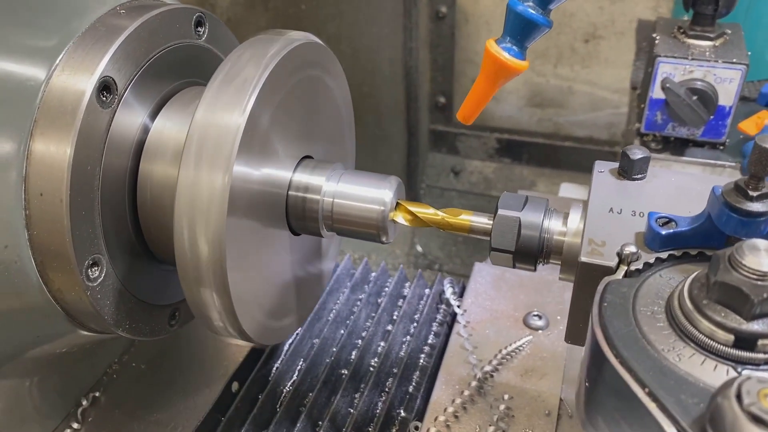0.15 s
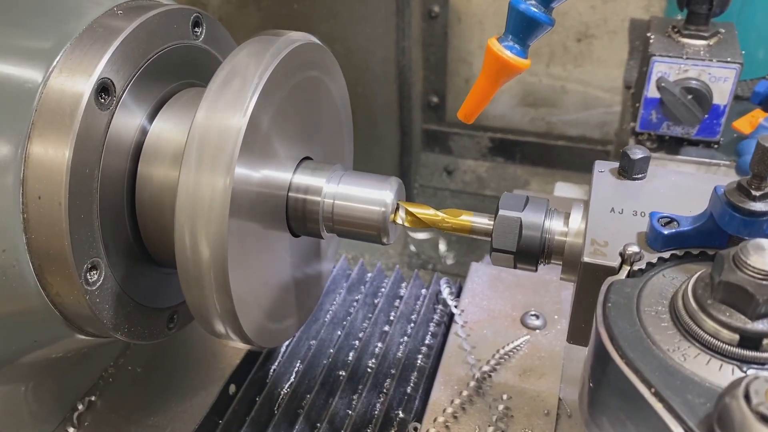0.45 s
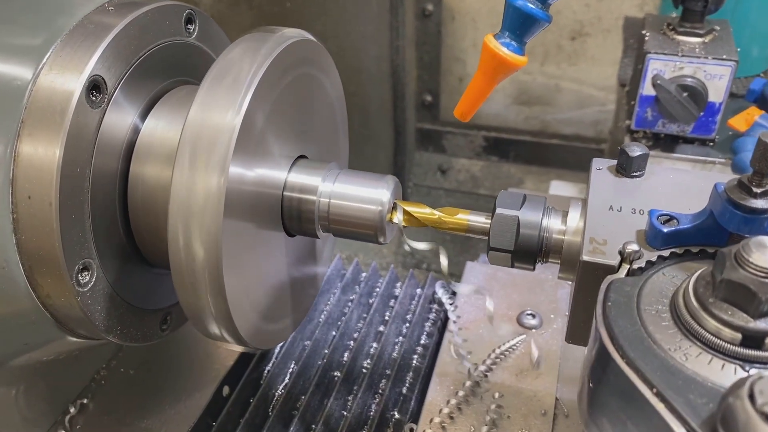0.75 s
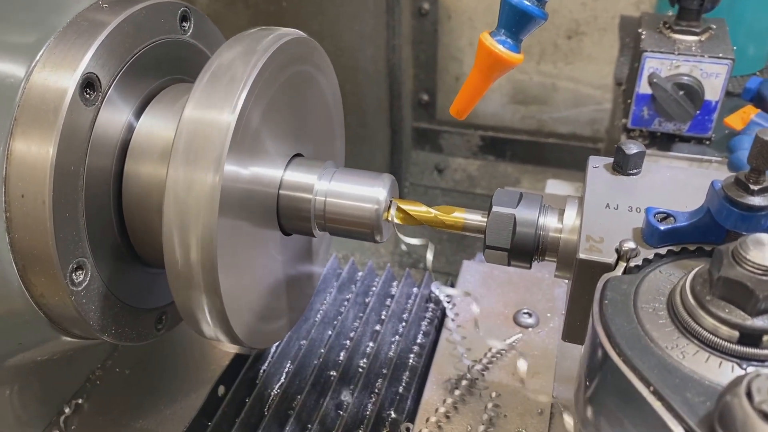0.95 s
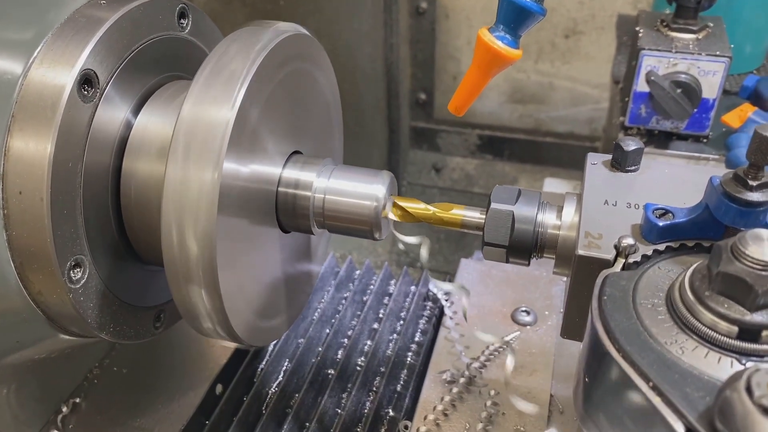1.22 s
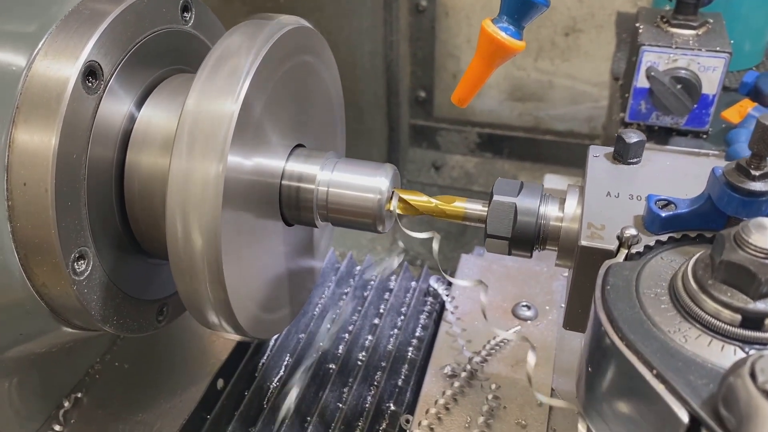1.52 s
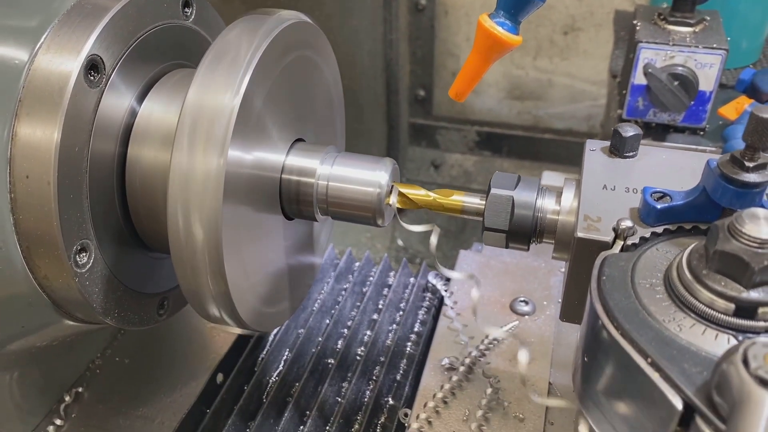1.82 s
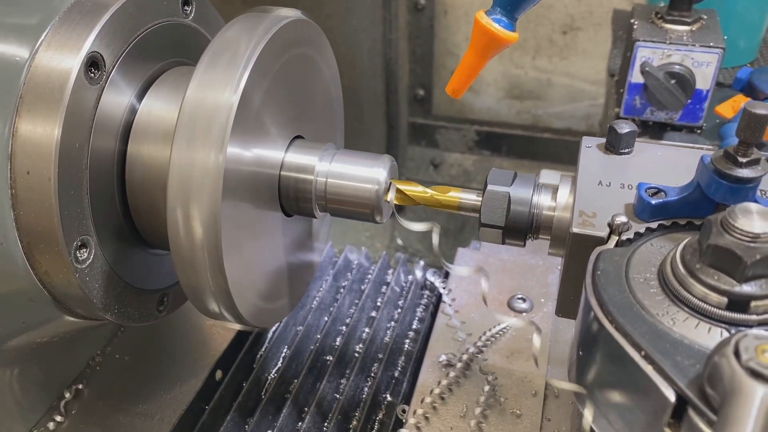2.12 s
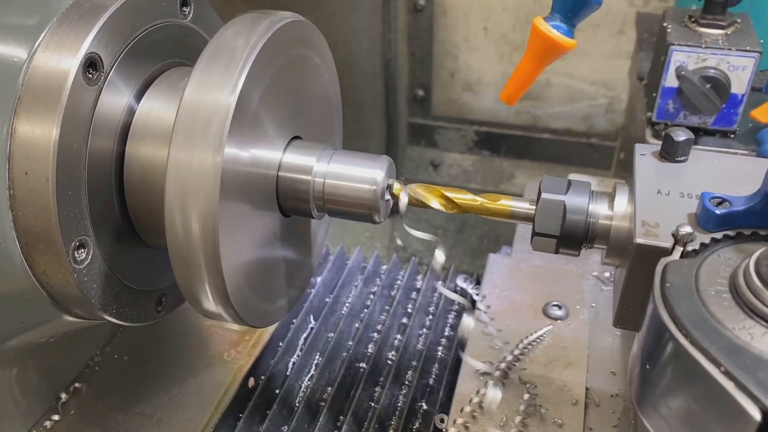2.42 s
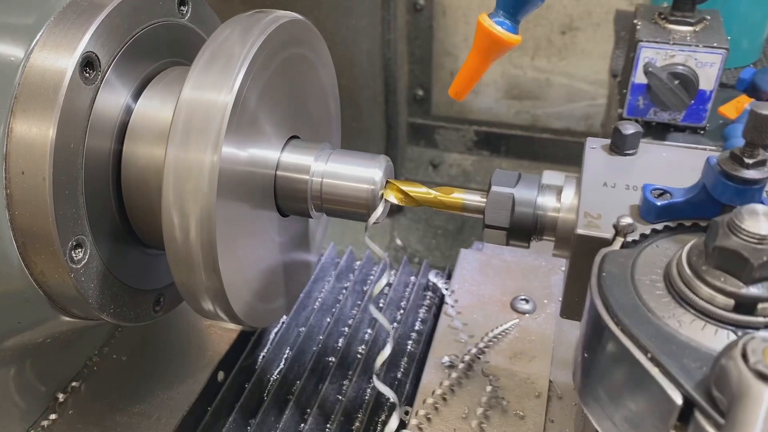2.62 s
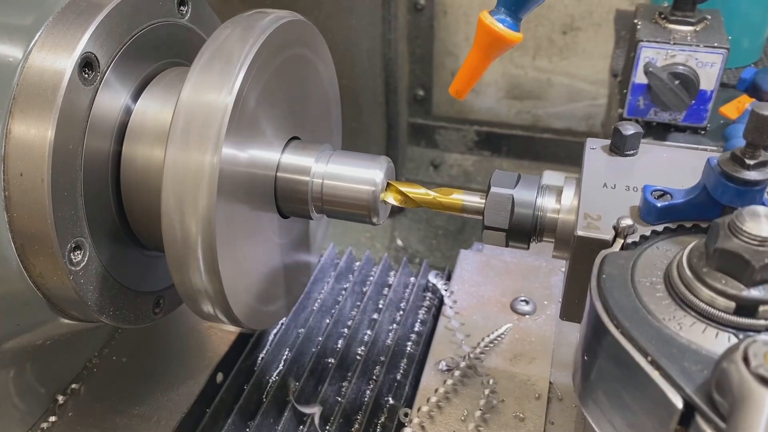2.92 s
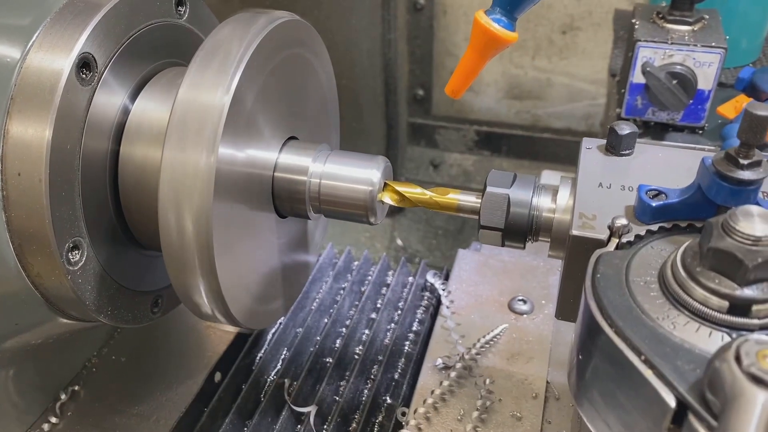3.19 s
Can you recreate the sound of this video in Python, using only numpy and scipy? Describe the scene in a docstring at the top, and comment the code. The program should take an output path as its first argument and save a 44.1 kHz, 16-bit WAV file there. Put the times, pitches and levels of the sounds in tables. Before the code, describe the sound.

A cutting-oil mist nozzle hisses brightly and continuously over a lathe, patchy and slightly fluttering. Brief high drill squeaks sound at about 0.06 and 0.2 s, with dull, deep bumps on the phone near 0.1 and 0.25 s. Hiss flares at 0.7, 2.2 and 2.55 s, the last sliding downward. From 2.87 s, thin squeaks repeat rapidly with faint rubbing; a weak bump lands near 3.27 s. Motor rumble stays low behind.

```python
"""A lathe drill squeaks as its flutes rub in a metal bar: short sagging tones of four partials plus faint rubbing noise.
A steady oil-mist nozzle covers it with coloured, patchy noise, and now and then the hiss flares in sliding bands.
A close phone picks it up and gets a few dull bumps: ringing case modes, falling thuds and a slow shake.
Behind it all the motor hums low, as filtered rumble with three narrow noise bands."""
import sys
import numpy as np
from scipy import signal
from scipy.fft import rfft, irfft, next_fast_len
from scipy.io import wavfile
from scipy.ndimage import uniform_filter1d, map_coordinates

SR = 44100
rng = np.random.default_rng(int(sys.argv[2]) if len(sys.argv) > 2 else 0)


def wav_out(sig):
    """Save sig, one row per channel (or a flat mono array), as 16-bit PCM at SR to the path in sys.argv[1]."""
    wavfile.write(sys.argv[1], SR, np.round(np.clip(np.atleast_2d(sig).T, -1, 1) * 32767).astype(np.int16))


N = 147735


def amp(db):
    """Decibels to linear gain."""
    return 10 ** (np.asarray(db) / 20)


def unit(x):
    """Scale to an rms of 1."""
    return x / np.sqrt(np.mean(x ** 2) + 1e-20)


def along(points, hz):
    """Read (pitch_hz, value) points on a log frequency axis."""
    point_hz, value = np.transpose(points)
    return np.interp(np.log(hz + 1), np.log(point_hz + 1), value)


def curve(rows):
    """Draw the second column over time in seconds, one value per sample."""
    return np.interp(np.arange(N) / SR, *np.transpose(rows)[:2])


def wobble(rate):
    """A smooth random curve with `rate` knots a second."""
    knots = rng.standard_normal(int(N * rate / SR) + 4)
    return map_coordinates(knots, [np.arange(N) * rate / SR])


def filtered(x, response):
    """Filter x by a complex response of frequency, with room for a tail."""
    m = next_fast_len(N + SR // 4)
    spectrum = rfft(x, m) * response(np.fft.rfftfreq(m, 1 / SR))
    return irfft(spectrum, m)[..., :N]


def bell(position, centre, width):
    """Round Gaussian gain over frequency or time; width is one standard deviation."""
    return np.exp(-.5 * ((position - centre) / width) ** 2)


def patches(hz, t):
    """A random field of rms 1, smooth over a few bands and frames."""
    field = rng.standard_normal((len(hz), len(t)))
    field = uniform_filter1d(field, size=6, axis=0)
    return unit(uniform_filter1d(field, size=10, axis=1))


def shaped(gain):
    """Two unrelated noises shaped by a gain over frequency and time."""
    hz, t, z = signal.stft(rng.standard_normal((2, N)), SR, nperseg=512)
    return signal.istft(z * gain(hz[:, None], t), nperseg=512)[1][:, :N]


def ports(hz):
    """Gain and phase from a near source to the two microphone ports, split evenly between them."""
    # Phase by which the left port leads: pitch_hz, lead_rad
    port_lead = [(0, 0), (1120, .8), (1640, -.1), (3880, 2.1), (4650, -.4), (5000, .4), (6900, -.01),
                 (8010, -2.9), (9910, -5.8), (10500, -6.28), (11900, -6.32), (12800, -9.42), (13800, -9.43),
                 (15100, -12.5)]
    # Level difference of the ports: pitch_hz, left_minus_right_db
    port_tilt = [(200, .2), (600, 4), (2000, 4), (3000, 1.5), (6300, .3), (7500, 3.5), (8500, 0)]
    lead = np.interp(hz, *np.transpose(port_lead))
    half = amp(along(port_tilt, hz) / 2) * np.exp(.5j * lead)
    return np.array([half, 1 / half])


def spread(pair):
    """Mix two unrelated noises to a left-right likeness, with the level and phase of ports()."""
    # How alike the noise is left and right, by pitch: pitch_hz, likeness_share
    likeness = [(100, 0.98), (700, 0.88), (1500, 0.545), (4500, 0.37), (5800, 0.65), (6200, 0.92),
                (6800, 1), (7500, 0.895), (9000, 0.61), (10800, 0.88), (12300, 0.51), (12900, 1),
                (14600, 1)]

    def turn(hz):
        return np.arccos(np.clip(along(likeness, hz), 0, 1)) / 2

    mid = filtered(pair[0], lambda hz: np.cos(turn(hz)) * ports(hz))
    side = filtered(pair[1], lambda hz: np.sin(turn(hz)) * ports(hz))
    return mid + side * [[1], [-1]]


def squeaks():
    """Rough stick-slip tones: pitch sags as the flute grips, then lifts; upper partials swell more steeply."""
    # Drill squeaks: start_s, length_s, pitch_hz, sag_share (start to lowest pitch), then
    # partial_1_db, partial_2_db, partial_3_db, partial_4_db (rms at full grip, before scatter and pan)
    squeak_table = [(0.056, 0.044, 3395, 0.014, -52, -23, -44, -17),
                    (0.201, 0.03, 3460, .005, -55, -35, -31.5, -40),
                    (0.205, 0.081, 3380, 0.015, -51, -24.5, -39, -20),
                    (2.873, 0.027, 3569, 0.0108, -32, -29, -36, -34.5),
                    (2.962, 0.027, 3493, 0.0148, -40, -31.5, -36, -34.5),
                    (3.01, 0.032, 3500, 0.019, -36.5, -30, -30.5, -31),
                    (3.077, 0.0256, 3505, .025, -37, -31, -31, -33.5),
                    (3.119, 0.0456, 3510, 0.036, -33.5, -29.5, -30.5, -31),
                    (3.198, 0.013, 3590, .02, -37, -33, -46, -36),
                    (3.248, 0.038, 3520, 0.038, -36.5, -31, -30, -23.5),
                    (3.301, 0.0299, 3500, 0.032, -36.5, -28.5, -32, -33.5)]
    # Faint rubbing between the late squeaks: time_s, level_db
    rub_level = [(2.82, -70), (2.95, -43), (3.35, -43)]
    # Pan beyond the ports' own: pitch_hz, left_minus_right_db
    pan = [(3500, 6), (6800, 1.5), (9000, 0)]
    rub_hz, rub_width_hz = 3540, 82
    lowest_at, edge = 0.495, 0.21  # share of the squeak: place of the lowest pitch, length of each soft end
    waver_share, shimmer_db = 0.0094, 1.5  # random scatter of pitch and level
    rough_db = 2  # added level scatter of the lowest partial and the rubbing

    out = np.zeros(N)
    waver = wobble(500)
    shimmer = [wobble(220) for _ in range(4)]
    for start, length, hz, sag, *partials_db in squeak_table:
        i = np.arange(round(start * SR), min(N, round((start + length) * SR)))
        progress = (i / SR - start) / length
        bend = sag * (((progress - lowest_at) / lowest_at) ** 2 - .3)
        phase = 2 * np.pi * np.cumsum(hz * (1 + bend + waver_share * waver[i])) / SR
        swell = np.clip(np.minimum(progress, 1 - progress) / edge, 0, 1)
        for k, db in enumerate(partials_db):
            scatter_db = shimmer_db + (k == 0) * rough_db
            level = swell ** (k + 1) * amp(db + scatter_db * shimmer[k][i])
            out[i] += np.sqrt(2) * level * np.sin((k + 1) * phase)

    rub = unit(filtered(rng.standard_normal(N), lambda hz: bell(hz, rub_hz, rub_width_hz)))
    out += rub * amp(curve(rub_level) + (shimmer_db + rough_db) * wobble(40))
    halves = np.array([[.5], [-.5]])
    return filtered(out, lambda hz: ports(hz) * amp(halves * along(pan, hz)))


def jet():
    """Oil-mist hiss: patchy, fluttering noise whose lower part and one mid-treble band drift on their own."""
    # Colour of the oil-mist jet: pitch_hz, level_db (per Hz, relative)
    jet_colour = [(560, -13), (1000, -12.5), (1300, -8), (1600, -10.5), (2100, -3), (3300, -2.5),
                  (4400, -5.5), (5600, -4.5), (6600, 0), (7500, -5), (8100, -1), (8900, -3), (10400, 0),
                  (11200, -4.5), (12600, -4), (13400, -5.5), (14100, 3), (15000, -1.5)]
    # Course of the hiss: time_s, level_db, low_extra_db (below about 5 kHz)
    jet_level = [(0, -22, 0.38), (.3, -25, 1), (1.5, -24.5, 0.1), (2.1, -24.5, 0.22), (2.4, -26, 3),
                 (2.75, -27, 2), (3, -25, 1), (3.35, -23.5, -1)]
    # Drift of the band at band_hz: time_s, extra_db (over the jet's colour)
    band_level = [(0, 1), (.4, 0), (2, 0.2), (2.3, -0.5), (2.6, 3), (2.75, -2), (2.9, 0.5), (3.35, -0.5)]
    # Steel parts ringing in the hiss: pitch_hz, width_hz (standard deviation), boost_db
    steel_rings = [(2847, 68, 4.5), (5150, 47, 3.5)]
    band_hz, band_width_hz = 6500, 1200
    flutter_db, patchy_db = 0.25, 1.22

    def gain(hz, t):
        band_db = np.interp(t, *np.transpose(band_level)) * bell(hz, band_hz, band_width_hz)
        low_db = np.interp(t, *np.transpose(jet_level)[::2]) / (1 + (hz / 5000) ** 6)
        return amp(patchy_db * patches(hz, t) + band_db + low_db)

    def colour(hz):
        ring_db = sum(db * bell(hz, centre, width) for centre, width, db in steel_rings)
        return amp(along([(250, -45.0)] + jet_colour, hz) + ring_db)

    hiss = filtered(shaped(gain), colour)
    flutter = wobble(4.53) + wobble(17)  # slow and quicker
    return unit(hiss) * amp(curve(jet_level) + flutter_db * flutter)


def flares():
    """Bright swells of hiss: noise bands that rise roundly, die away and slide in pitch."""
    # Flares: peak_s, rise_s (standard deviation), fall_s (time constant), peak_db, centre_hz, slide_hz_per_s
    flare_table = [(.08, 0.19, 0.58, -33.5, 8700, 127.5), (.68, 0.034, 0.1, -35.5, 9150, -100),
                   (2.19, 0.024, 0.1, -30, 8900, -1000), (2.53, 0.022, 0.036, -31.5, 8750, 4),
                   (2.595, 0.018, 0.1, -30, 9650, -5000), (3.1, 0.31, 1, -31, 8500, 100)]
    width_hz, patchy_db = 1700, 2.5

    def gain(hz, t):
        total = 0
        for peak, rise, fall, db, centre, slide in flare_table:
            swell = np.where(t < peak, bell(t, peak, rise), np.exp(-np.abs(t - peak) / fall))
            band = bell(hz, centre + slide * (t - peak), width_hz / 2)
            total = total + amp(db) * swell * band
        return amp(patchy_db * patches(hz, t)) * total

    return shaped(gain) * np.sqrt(SR / 2 / width_hz)  # make up for the narrow band


def bumps():
    """Knocks ring two modes of the phone case; heavy thuds fall in pitch and leave an uneven shake."""
    # Modes of the phone case, high then low: pitch_hz, level_db (relative), t60_s
    case_modes = [(493, 12, 0.0179), (274, -1, 0.031)]
    # Knocks on the case: start_s, level_db, low_mode_extra_db
    knock_table = [(.0815, -25, 0), (.231, -31, 0), (.244, -35.5, 10), (.257, -36, 8), (3.27, -52, 16)]
    # Heavy thuds: start_s, level_db, sweep_hz (start above final pitch), final_hz, t60_s
    thud_table = [(.0815, 0.2, 750, 55, .078), (.2375, -1.5, 130, 78, .054), (3.269, -25, 900, 65, .075)]
    knock_rise_s, swell_s = 0.0044, .024
    sweep_s = .0052  # the bending wave brings its treble first
    shake_hz, shake_db, shake_rise_s, shake_t60_s = 52, -22, .14, .36  # holder shaking; level against the thud
    shake_waver = .12  # random pitch share
    lead_rad = .26  # left leads, beyond the ports' own

    out = np.zeros(N + SR)
    t = np.arange(SR // 2) / SR

    def rise(seconds):
        return 1 - np.exp(-(t / seconds) ** 2)

    high, low = (rise(knock_rise_s) * amp(db - 60 * t / t60) * np.sin(2 * np.pi * hz * t)
                 for hz, db, t60 in case_modes)
    for start, db, low_db in knock_table:
        out[round(start * SR):][:len(t)] += amp(db) * (high + amp(low_db) * low)

    for start, db, sweep_hz, hz, t60 in thud_table:
        turns = hz * t + sweep_hz * sweep_s * (1 - np.exp(-t / sweep_s))
        thud = rise(swell_s) * amp(-60 * t / t60) * np.sin(2 * np.pi * turns)
        swing = 2 * np.pi * shake_hz * np.cumsum(1 + shake_waver * wobble(30)[:len(t)]) / SR
        shake = rise(shake_rise_s) * amp(shake_db - 60 * t / shake_t60_s) * np.sin(swing)
        out[round(start * SR):][:len(t)] += amp(db) * (thud + shake)

    sides = np.array([[1], [-1]])
    return filtered(out[:N], lambda hz: ports(hz) * np.exp(.5j * lead_rad * sides))


def motor():
    """Low motor sound: broad rumble noise with a few narrow bands that waver as hum."""
    # Motor hum bands: pitch_hz, width_hz (two standard deviations), level_db
    hum_bands = [(118.6, 13, -61), (147, 41, -66), (202.2, 5.7, -64.5)]
    # Colour of the rumble: pitch_hz, level_db (per Hz, relative)
    rumble_colour = [(25, -30), (45, -3), (70, 2), (200, 0.5), (340, -1.5), (500, -5), (900, -2)]
    rumble_db = -55.5

    rumble = unit(filtered(rng.standard_normal((2, N)),
                           lambda hz: amp(along(rumble_colour + [(1500, -61.0)], hz))))
    hum = np.zeros((2, N))
    for centre, width, db in hum_bands:
        band = filtered(rng.standard_normal((2, N)), lambda hz: bell(hz, centre, width / 2))
        hum += amp(db) * unit(band)
    return amp(rumble_db) * rumble + hum


def scene():
    """Spread the noises left and right and add the squeaks and bumps, already in stereo."""
    noises = jet() + flares() + motor()
    return squeaks() + spread(noises) + bumps()


def record(dry):
    """The phone keeps nothing above its band limit."""
    top_hz = 15745
    return filtered(dry, lambda hz: hz < top_hz)


dry = scene()
out = record(dry)
wav_out(out)
```